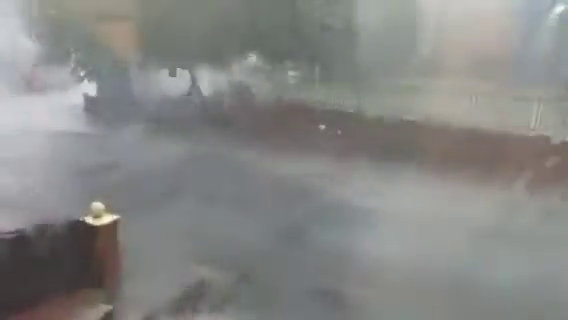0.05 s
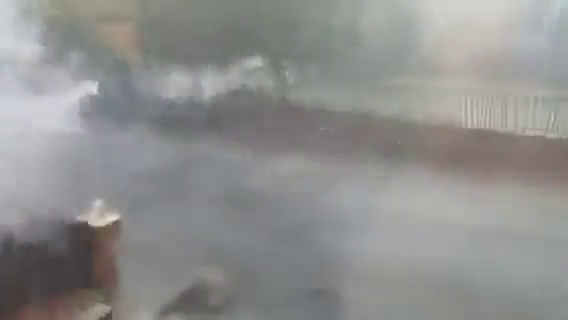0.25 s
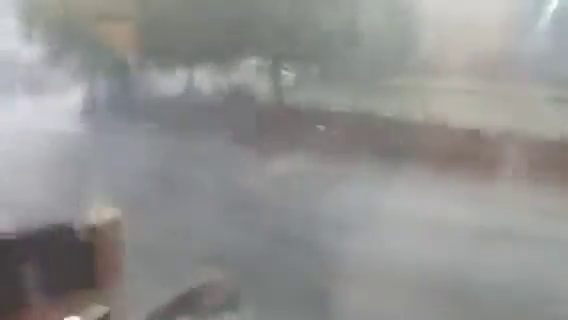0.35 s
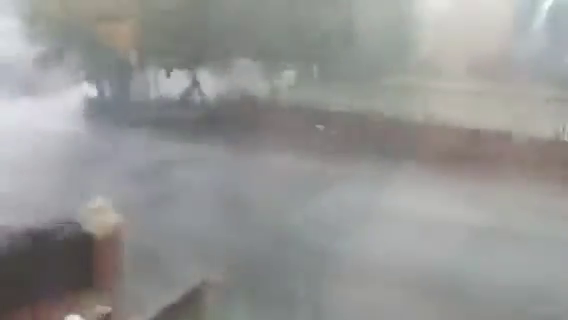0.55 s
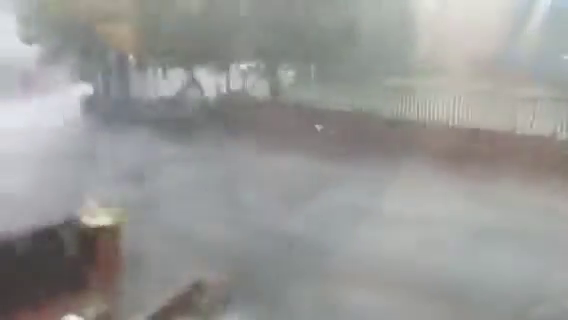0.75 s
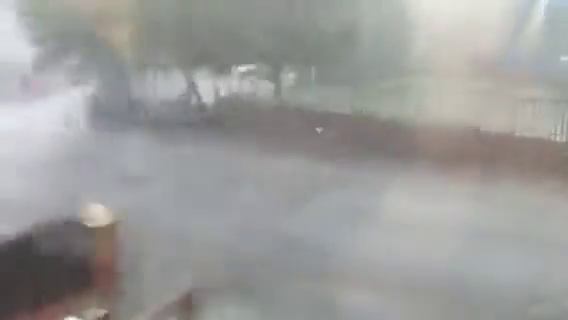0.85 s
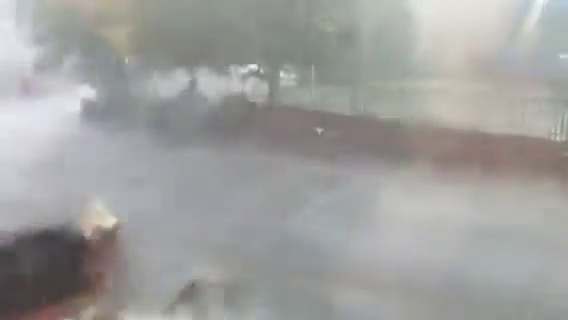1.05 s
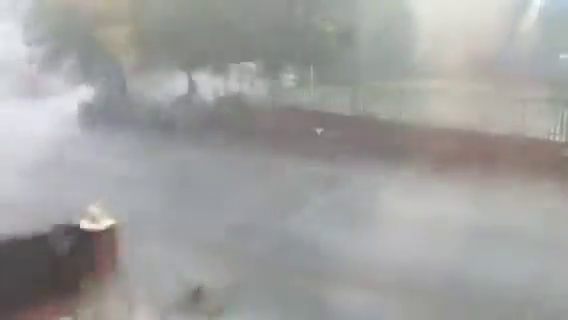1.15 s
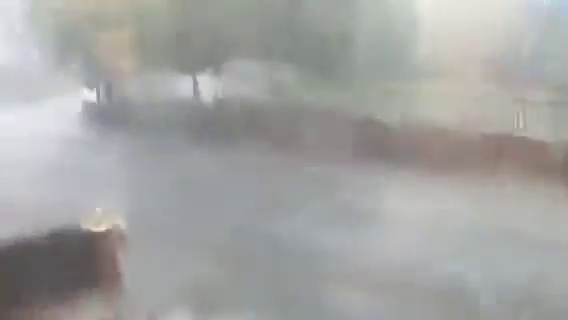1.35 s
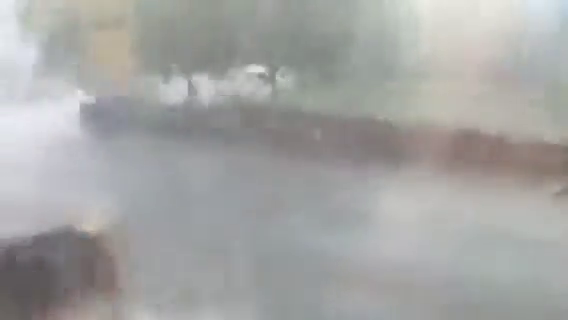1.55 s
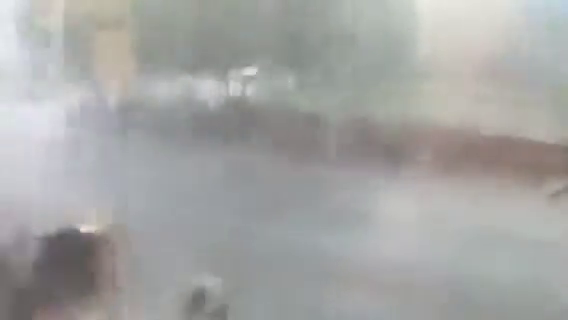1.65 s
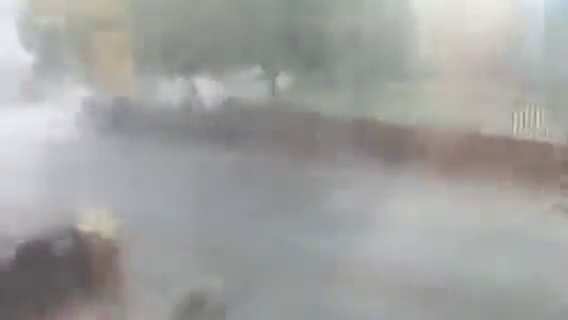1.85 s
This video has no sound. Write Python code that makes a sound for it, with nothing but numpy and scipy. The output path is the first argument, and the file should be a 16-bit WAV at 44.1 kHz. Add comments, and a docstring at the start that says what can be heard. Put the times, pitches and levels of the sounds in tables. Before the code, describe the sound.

A rainstorm is heard from indoors, muffled by glass, with drops pattering on the pane. One sharp knock lands near the microphone as a gust fades, then the wind and rain swell louder.

```python
"""Indoors, behind a window in a rainstorm: a gust dies away, then a stronger one swells.
The downpour roars dully through the glass and wind stirs low resonances of window and room.
Fine drops patter on the pane; heavy ones tap and splash. One firm bump close by,
probably against the pane, sets its modes ringing and echoes briefly in the room."""
import sys
import numpy as np
from scipy import signal
from scipy.fft import rfft, irfft, next_fast_len
from scipy.io import wavfile

SR = 44100
rng = np.random.default_rng(int(sys.argv[2]) if len(sys.argv) > 2 else 0)


def store_wav(level_fs):
    """Save 16-bit WAV to argv[1]."""
    pcm = np.round(np.clip(np.atleast_2d(level_fs), -1, 1) * 32767)
    wavfile.write(sys.argv[1], SR, pcm.T.astype(np.int16))


N = 83790
TIME = np.arange(N) / SR
BUMP_S = .2095
BEND_DELAY_S = .0011   # bending-wave travel time at 1 kHz


def from_db(db):
    """Decibels to gain."""
    return 10 ** (np.asarray(db) / 20)


def rms_one(x):
    """Scale to unit power."""
    return x / np.sqrt(np.mean(x ** 2) + 1e-20)


def drift(rate_hz):
    """Slow random wander, unit RMS."""
    step, settle = 40, 2000
    pole = np.exp(-2 * np.pi * rate_hz * step / SR)
    white = rng.standard_normal(N // step + settle + 2)
    slow = signal.lfilter([1], [1, -2 * pole, pole * pole], white)[settle:]
    return np.interp(np.arange(N) / step, np.arange(len(slow)), rms_one(slow))


def colour(x, spectrum):
    """Minimum-phase filter from (frequency [Hz], level [dB]) points; unit power out."""
    size = 2 * next_fast_len(N)
    hz, db = np.transpose(spectrum)
    log_hz = np.log(np.maximum(np.arange(size // 2 + 1) * SR / size, 1))
    log_gain = np.log(from_db(np.interp(log_hz, np.log(hz), db)))
    bass_rolloff = 2 * np.minimum(log_hz - np.log(hz[0]), 0)
    cepstrum = irfft(log_gain + bass_rolloff)
    cepstrum[1:size // 2] *= 2
    cepstrum[size // 2 + 1:] = 0
    return rms_one(irfft(rfft(x, size) * np.exp(rfft(cepstrum)))[:N])


def noise(spectrum):
    """Coloured noise, unit power."""
    return colour(rng.standard_normal(N), spectrum)


def decay(start_s, t60_s):
    """Sudden start, exponential fall."""
    return (TIME >= start_s) * from_db(-60 * np.maximum(TIME - start_s, 0) / t60_s)


def ring(start_s, hz, t60_s):
    """Struck mode: a dying sine."""
    return decay(start_s, t60_s) * np.sin(2 * np.pi * hz * (TIME - start_s))


def drop_clicks(per_s, spread_db):
    """Random impacts, many small and a few large; unit power."""
    sizes = from_db(spread_db * np.minimum(rng.exponential(1, N), 5))
    signs = rng.choice([-1, 1], N)
    return rms_one(sizes * signs * (rng.random(N) < per_s / SR))


def downpour(level_db, flutter_db, grain_gain):
    """Countless drops outside merge into a grainy roar, dulled by the glass."""
    # roar through the glass: (frequency [Hz], level [dB])
    roar_spectrum = [(100, -15), (150, -12), (300, -2), (480, -1.5), (650, -3.5), (900, -5.5), (1600, -8),
                     (2200, -10.5), (2700, -17.5), (3300, -15), (4300, -26), (8000, -37), (16000, -58)]
    grains = drop_clicks(per_s=1500, spread_db=3.5)
    wash = colour(rng.standard_normal(N) + grain_gain * grains, roar_spectrum)
    return from_db(level_db + flutter_db * drift(rate_hz=5)) * wash


def wind_rumble(level_db):
    """Wind buffets the window and stirs low resonances."""
    # window and room: (frequency [Hz], width [Hz], level [dB])
    resonances = [(146.5, 13.6, -4.5), (179, 28, -9.5), (212.2, 17.4, 0.5), (266, 26, -4.5),
                  (342, 62, -10.5), (390, 53, -20), (480.5, 20, -7)]
    rumble = 0
    for hz, width_hz, db in resonances:
        radius = np.exp(-np.pi * width_hz / SR)
        feedback = [1, -2 * radius * np.cos(2 * np.pi * hz / SR), radius * radius]
        mode = signal.lfilter([1, 0, -1], feedback, rng.standard_normal(N))
        rumble += from_db(db) * rms_one(mode)
    band = signal.butter(4, [125, 700], "band", fs=SR, output="sos")
    return from_db(level_db) * rms_one(signal.sosfilt(band, rumble))


def patter(level_db, spray_db, flutter_db, flicker_db):
    """Fine drops patter over a hiss of spray; each band's level flickers at random."""
    # fine drops on glass: (frequency [Hz], level [dB])
    patter_spectrum = [(1000, -18), (2500, 3.5), (4200, -0.5), (6500, 0), (9000, -6), (12000, -10),
                       (16000, -14.5)]
    edges_hz = np.geomspace(1000, 16000, 9)
    drops = 0
    for low_hz, high_hz in zip(edges_hz, edges_hz[1:]):
        band = signal.butter(2, [low_hz, high_hz], "band", fs=SR, output="sos")
        impacts = drop_clicks(per_s=900, spread_db=1.5)
        spray = from_db(spray_db) * rng.standard_normal(N)
        drops += signal.sosfilt(band, impacts + spray) * from_db(flicker_db * drift(rate_hz=34))
    return from_db(level_db + flutter_db * drift(rate_hz=45)) * colour(drops, patter_spectrum)


def heavy_drops():
    """Each big drop gives a dull tap, a short pitched ping and a bright splash."""
    # hits on the pane: (time [s], ping [Hz], tap and ping level [dB], splash centre [Hz], splash [dB])
    hits = [(.066, 1860, -41, 5750, -48), (.121, 1107, -68, 8000, -54), (.161, 1570, -38, 7900, -52),
            (.25, 1390, -48, 4900, -43), (0.39, 1610, -38, 4900, -54.5), (0.603, 1560, -46, 4100, -63),
            (0.773, 2930, -56, 2980, -56), (0.874, 1320, -48, 5280, -71), (0.945, 1390, -49, 5660, -54.5),
            (0.9716, 1160, -46.5, 5100, -61), (1.122, 1470, -46, 4800, -55), (1.2238, 1500, -36, 4100, -70),
            (1.2717, 1450, -37, 5100, -51), (1.3215, 1550, -32, 4600, -38), (1.3523, 1560, -32, 4000, -52),
            (1.385, 1440, -38, 4800, -47), (1.433, 1110, -43, 4770, -40.5), (1.49, 1510, -48, 7160, -44.5),
            (1.5056, 1920, -32, 4500, -42), (1.55, 1450, -39, 7060, -44.5), (1.61, 1500, -43, 9000, -49),
            (1.6648, 1570, -37.5, 6000, -45), (1.679, 1920, -39, 6660, -47.5),
            (1.695, 1500, -42, 6570, -44), (1.706, 1430, -34, 4750, -56), (1.7555, 1430, -49, 7000, -46.5),
            (1.8742, 1600, -37, 5000, -57)]
    # dull tap: (frequency [Hz], level [dB])
    tap_spectrum = [(300, 2.5), (900, -12.5), (1550, 2), (2300, -11), (4000, -23), (9000, -32)]
    # splash: (frequency [multiple of centre], level [dB])
    splash_shape = [(.3, -16), (.7, -0.5), (1, 0.5), (1.4, -6), (3, -26)]
    tap_noise = noise(tap_spectrum)
    out = 0
    for start_s, ping_hz, hit_db, splash_hz, splash_db in hits:
        ping = from_db(hit_db - 3.5) * ring(start_s, ping_hz, t60_s=.038)
        tap = from_db(hit_db - 3) * decay(start_s, t60_s=.035) * tap_noise
        splash_noise = noise([(multiple * splash_hz, db) for multiple, db in splash_shape])
        splash = from_db(splash_db - 1) * decay(start_s, t60_s=.054) * splash_noise
        out += ping + tap + splash
    return out


def crack():
    """The contact pulse crosses the pane as a bending wave: treble first, bass last."""
    # contact pulse: (frequency [Hz], level [dB])
    pulse_spectrum = [(120, -15), (240, -1.5), (380, -4.5), (560, 7.5), (850, -2.5), (1350, 7.5),
                      (2000, -5.5), (2800, -9.5), (3700, -19), (4600, -47), (16000, -57)]
    pulse = colour(signal.unit_impulse(N), pulse_spectrum)
    hz = np.arange(N // 2 + 1) * SR / N
    lag_cycles = hz * BUMP_S + 2 * BEND_DELAY_S * np.sqrt(1000 * hz)
    chirp = irfft(rfft(pulse) * np.exp(-2j * np.pi * lag_cycles), N)
    return from_db(-3) * chirp / np.abs(chirp).max()


def bump(contact_cutoff_hz):
    """Blunt blow on the pane: crack, knock, ringing modes, rebound, faint rattle, room echo."""
    # pane modes: (frequency [Hz], relative level [dB], t60 [s])
    pane_modes = [(144, -34.5, 0.16), (217, -10, 0.051), (270, -6.5, 0.084), (271, -19.5, 0.21),
                  (456.3, -24, 0.19), (545, -22, 0.084), (599, -24, 0.13), (665.4, -23, 0.17),
                  (718, -23, 0.079), (887, -24.5, 0.13), (1000, -30, 0.1), (1150, -17.5, 0.045),
                  (1210, -51, 0.039), (1405, -25, 0.065), (1550, -16, 0.036), (2025, -24, 0.022),
                  (2210, -35.5, 0.12), (2570, -31, 0.062)]
    # dull, hollow knock, a short noise burst near 480 Hz: (frequency [Hz], level [dB])
    knock_spectrum = [(200, -1), (480, 28), (800, -8), (1350, 4), (1900, -20), (2600, -21), (3600, -40),
                      (6000, -60)]
    # frame rattle: (frequency [Hz], level [dB])
    rattle_spectrum = [(3000, -2), (6000, 0), (9000, -6), (12000, -2), (16000, -17)]
    # room echo: (frequency [Hz], level [dB])
    echo_spectrum = [(80, -36), (140, -4), (250, 7), (350, -1.5), (550, 4.5), (850, -6.5), (1450, -3),
                     (2200, -15.5), (3200, -25), (5000, -34.5), (15000, -52)]
    knock = from_db(-35) * decay(BUMP_S + BEND_DELAY_S, t60_s=.037) * noise(knock_spectrum)
    modes = 0
    for k, (hz, db, t60_s) in enumerate(pane_modes):
        arrival_s = BUMP_S + BEND_DELAY_S * np.sqrt(1000 / hz)
        modes += (-1) ** k * from_db(db + 2.5) * ring(arrival_s, hz, t60_s)
    rebound = from_db(-17.5) * ring(BUMP_S + .018, hz=693, t60_s=.049)
    blunt_contact = signal.butter(4, contact_cutoff_hz, fs=SR, output="sos")
    pane = signal.sosfilt(blunt_contact, crack() + knock + modes + rebound)
    rattle = from_db(-44.5) * decay(BUMP_S, t60_s=.048) * noise(rattle_spectrum)
    build_up = np.clip((TIME - BUMP_S) / .0054, 0, 1)
    echo = from_db(-20) * build_up * decay(BUMP_S, t60_s=.25) * noise(echo_spectrum)
    return pane + rattle + echo


def scene():
    """Storm, drops and bump at one microphone."""
    # storm strength, relative levels: (time [s], roar [dB], patter [dB], rumble [dB])
    gusts = [(0, -41.5, -53, -48.5), (.17, -45.5, -58.5, -48), (.3, -45, -59, -54), (.38, -48, -63, -49),
             (.44, -51, -63, -56.5), (.51, -49.5, -64.5, -45), (.6, -53.5, -65.5, -57),
             (.8, -53.5, -68.5, -55), (.93, -53, -60.5, -62), (1.03, -53, -63, -56), (1.17, -49, -61, -56),
             (1.25, -45.5, -56.5, -44.5), (1.33, -39.5, -50.5, -42), (1.43, -38.5, -50.5, -40),
             (1.55, -39, -53, -38), (1.62, -38.5, -52, -49), (1.69, -40, -54, -43),
             (1.79, -41.5, -54.5, -47), (1.9, -41.5, -56.5, -48.5)]
    times_s, *levels_db = np.transpose(gusts)
    roar_db, patter_db, rumble_db = [np.interp(TIME, times_s, db) for db in levels_db]
    storm = downpour(roar_db - 1, flutter_db=1.1, grain_gain=.71) + wind_rumble(rumble_db + 1.5)
    drops = patter(patter_db - 1.5, spray_db=-3, flutter_db=.33, flicker_db=1.5) + heavy_drops()
    return (storm + drops + bump(contact_cutoff_hz=4100))[None]


def record(dry):
    """Small microphone: bass loss, faint noise floor, top cut."""
    # noise floor: (frequency [Hz], level [dB])
    floor_spectrum = [(20, 6), (50, -3), (100, 16), (300, -9), (3000, -11), (16000, -4.5)]
    bass_hz, top_hz = 126, 15650
    bass_cut = signal.butter(3, bass_hz, "high", fs=SR, output="sos")
    top_cut = signal.ellip(10, .1, 70, top_hz, fs=SR, output="sos")
    floor = from_db(-69.5) * noise(floor_spectrum)
    return signal.sosfilt(top_cut, signal.sosfilt(bass_cut, dry) + floor)


dry = scene()
out = record(dry)
store_wav(out)
```